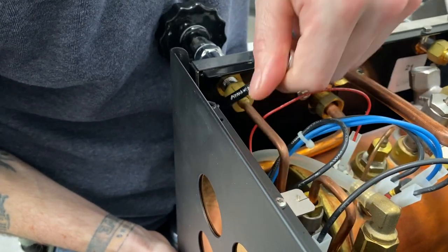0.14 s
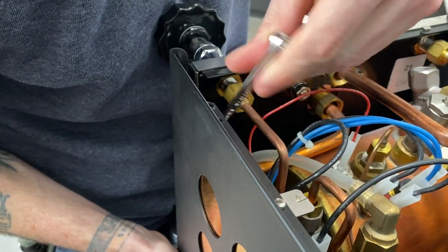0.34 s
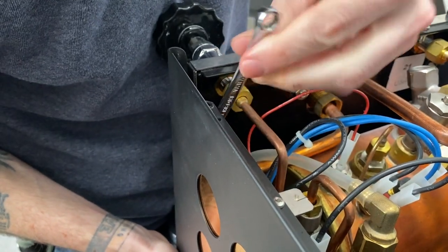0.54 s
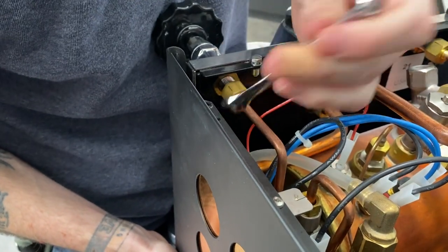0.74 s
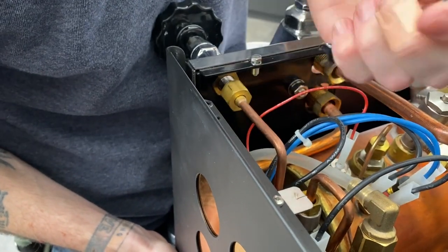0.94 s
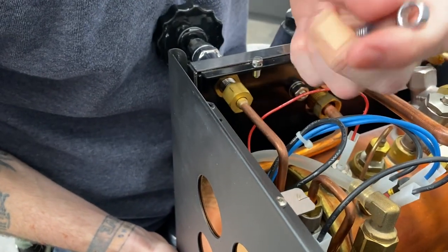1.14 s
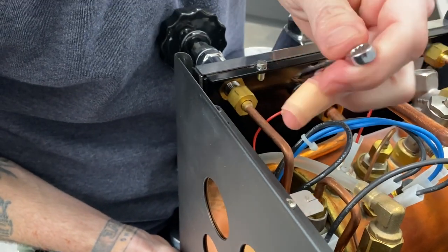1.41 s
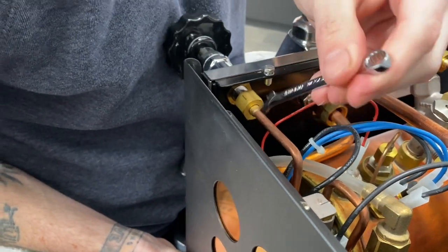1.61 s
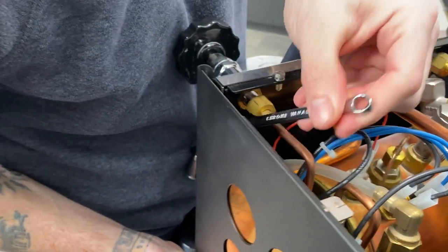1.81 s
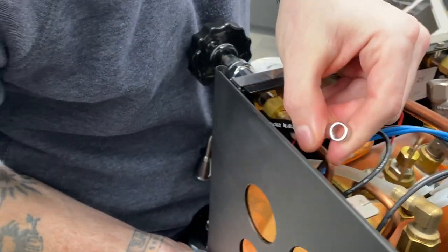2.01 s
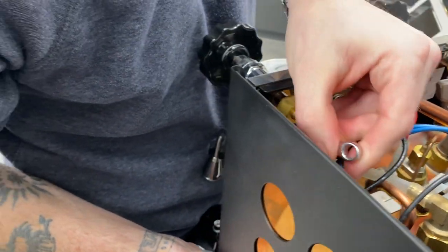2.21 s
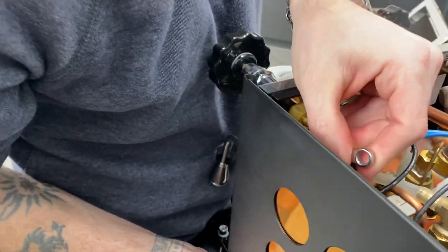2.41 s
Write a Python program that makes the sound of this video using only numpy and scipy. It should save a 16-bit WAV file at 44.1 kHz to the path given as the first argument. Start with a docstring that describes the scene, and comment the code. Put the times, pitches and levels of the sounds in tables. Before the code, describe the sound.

A small steel wrench clatters on a nut in a thin metal case, heard close in mono over faint, dull workshop air. Quick clacks from 0 to 0.28 s lead to one loud, briefly ringing clank at 0.32. Soft knocks near 0.53 and 0.76 and sparse faint ticks follow until 1.75. A bright knock and tick come around 1.8-1.9, then irregular clacks from 1.95 to 2.54, strongest near 2.15 and 2.27.

```python
"""A small steel wrench is worked on a fitting inside a sheet-metal case, close by, in quiet workshop air.
It first clacks on the nut and gives one loud blow; then, lifted off, it ticks and knocks against the case.
At the end it is seated again with a run of clacks. Each contact is a burst of filtered noise with a dense tail,
decaying sine modes of the panel and a slow push of the case. Narrow noise makes the light ticks,
beating pairs of sines make the pings, and soft band noise makes the rubs of the hand."""
import sys
import numpy as np
from scipy import signal
from scipy.fft import irfft, next_fast_len
from scipy.io import wavfile

SR = 44100
rng = np.random.default_rng(int(sys.argv[2]) if len(sys.argv) > 2 else 0)


def dump_mix(stems):
    """Bounce the given channels to the path in sys.argv[1] as a 16-bit WAV at rate SR."""
    frames = np.atleast_2d(stems).T  # one column per channel
    limited = np.clip(frames, -1, 1)  # hard clip at full scale
    pcm = np.round(limited * 32767).astype(np.int16)
    wavfile.write(sys.argv[1], SR, pcm)


N = 112454  # samples in the scene
RING_S = 0.7  # length computed for each blow and ping
RISE_S = 0.0017  # rise time of blows and pings


def undb(db):
    """Logarithmic level: decibels to amplitude gain."""
    return 10 ** (np.asarray(db) / 20)


def fade(t, t60):
    """Exponential damping: the amplitude falls by 60 dB in t60 seconds."""
    return np.exp(-np.log(1000) * t / max(t60, 1e-3))


def add(out, start, sound):
    """Superposition: mix a sound in at its start time."""
    i = max(int(start * SR), 0)
    out[i:i + len(sound)] += sound[:max(len(out) - i, 0)]


def axes(seconds):
    """Sampling: time and frequency axes of a sound of about this length."""
    n = 2 * next_fast_len(int(seconds * SR / 2))
    t = np.arange(n) / SR
    f = np.arange(n // 2 + 1) * SR / n + 1e-3  # kept off zero for divisions and logarithms
    return t, f


def noise(gain):
    """Random-phase synthesis: noise of rms 1 with the given amplitude spectrum."""
    phases = 2 * np.pi * rng.random(len(gain))
    x = irfft(gain * np.exp(1j * phases))
    return x / (x.std() + 1e-18)


def colour(f, resonances, dull_hz, order=6):
    """Resonance: Lorentzian power peaks on a flat response that falls away above a corner."""
    power = 1.0
    for hz, width, db in resonances:
        power = power + undb(db) ** 2 / (1 + (2 * (f - hz) / width) ** 2)
    return np.sqrt(power / (1 + (f / dull_hz) ** (2 * order)))


def passband(f, lo_hz, hi_hz, order=14):
    """Band limiting: amplitude gain of a steep band-pass."""
    return 1 / np.sqrt((1 + (lo_hz / f) ** order) * (1 + (f / hi_hz) ** order))


# spectrum of the workshop air: (frequency [Hz], relative spectral level [dB])
AIR_SPECTRUM = [(15, -46), (25, -15), (59, -5), (82, -9.5), (317, -10), (344, -1.5), (384, -14),
                (416, -2.5), (545, -10.5), (1560, -19.5), (2110, -24.5), (2990, -30.5), (16000, -28.5)]
AIR_DB = -64.5  # rms level


def workshop():
    """Stationary noise: steady, dull air noise with a fixed spectrum."""
    _, f = axes(N / SR + 1)
    hz, db = np.array(AIR_SPECTRUM).T
    spectrum_db = np.interp(np.log(f), np.log(hz), db)
    return undb(AIR_DB) * noise(undb(spectrum_db))[:N]


# rubs of hand and wrench: (time [s], length [s], level [dB], low edge [Hz], high edge [Hz])
RUBS = [(.003, 0.26, -65, 73.4, 159), (0.597, 0.2, -68.5, 890, 2520), (0.961, 0.072, -68, 8600, 15100),
        (1.649, 0.057, -68, 8540, 15000), (1.851, 0.11, -64.5, 600, 4900)]


def hand_rubs():
    """Friction noise: shifts of the grip give a low rumble, soft rubs and faint high hisses."""
    out = np.zeros(N)
    for start, length, db, lo_hz, hi_hz in RUBS:
        t, f = axes(length)
        swell = np.sin(np.pi * t / t[-1])
        add(out, start, undb(db) * swell * noise(passband(f, lo_hz, hi_hz, order=8)))
    return out


# light ticks and scrapes of the jaws:
# (time [s], level [dB], centre [Hz], nominal width before the factor 1.1 [Hz], t60 [s])
TICKS = [(0.078, -45.5, 4400, 4500, 0.0054), (0.16, -64, 4170, 1200, 0.053),
         (.3235, -26, 6600, 5980, 0.024), (0.354, -47, 7000, 8010, 0.075),
         (.5865, -54.5, 3120, 1750, 0.011), (.634, -58, 6950, 1200, 0.008), (.665, -60, 7600, 1800, 0.015),
         (0.687, -60, 5500, 6200, .04), (1.083, -57, 2800, 2800, 0.0063),
         (1.183, -55.5, 7080, 2980, 0.0047), (1.3828, -43.5, 2120, 260, 0.025),
         (1.6462, -49.5, 1250, 454, 0.031), (1.735, -49.5, 2860, 600, 0.015),
         (1.742, -50, 6540, 1800, 0.0079), (1.7935, -60, 10000, 5000, 0.11),
         (1.8664, -45.5, 10800, 3000, 0.033), (1.87, -50, 8520, 300, .06),
         (1.8915, -32.5, 7500, 2500, 0.008), (2.389, -48.5, 2660, 700, 0.036),
         (2.405, -54.5, 2300, 2000, .04)]


def ticks(rise_s=0.00025, tail_db=-30, tail_t60=0.193):
    """Selective excitation: a light touch excites one short resonance and a faint tail."""
    t, f = axes(RING_S / 2)
    out = np.zeros(N)
    for start, db, hz, width, t60 in TICKS:
        resonance = 1 / (1 + ((f - hz ** 2 / f) / (1.1 * width)) ** 2)
        decay = fade(t, t60) + undb(tail_db) * fade(t, tail_t60)
        envelope = (1 - np.exp(-t / rise_s)) * decay
        add(out, start, undb(db) * envelope * noise(resonance))
    return out


# tones that ring on in the loosely held wrench: (time [s], frequency [Hz], level [dB], t60 [s])
PINGS = [(.013, 875, -40.5, 0.19), (.013, 4670, -41, 0.044), (.762, 3320, -64, 0.089),
         (.762, 3610, -72, 0.43), (1.795, 4200, -54, 0.29), (1.868, 4215, -65.5, 0.63),
         (1.869, 8760, -62, .15), (1.981, 5394, -55, 0.18), (1.981, 4040, -47, 0.09)]
BEAT_HZ, TWIN_DB = 21, -2.5  # twin's offset upward, and its level relative to the first tone


def pings():
    """Beating: the loosely held wrench rings on with close pairs of tones."""
    t, _ = axes(RING_S)
    out = np.zeros(N)
    for start, hz, db, t60 in PINGS:
        tone = np.sin(2 * np.pi * hz * t)
        twin = np.sin(2 * np.pi * ((hz + BEAT_HZ) * t + rng.random()))
        envelope = np.minimum(t / RISE_S, 1) * fade(t, t60)
        add(out, start, undb(db) * envelope * (tone + undb(TWIN_DB) * twin))
    return out


PUSH_S, THUMP_CUT_HZ, THUMP_DB = 0.022, 6.9, 5.5  # push length, high-pass corner, gain


def thump(t):
    """Impulse and recoil: the whole case gives way to a blow and swings back."""
    push = np.sin(np.pi * np.minimum(t / PUSH_S, 1)) ** 2
    recoil = signal.butter(2, THUMP_CUT_HZ, "high", fs=SR, output="sos")
    return undb(THUMP_DB) * signal.sosfilt(recoil, push)


# low shudder of the case; its level is relative to a blow's thump column
THUD_DB, THUD_LO_HZ, THUD_HI_HZ, THUD_T60_S = -21, 70, 220.2, 0.66
HOLD_S, TAIL_RISE_S = 0.0056, 0.0051  # rattle held before it decays; time constant of the tail's rise
GRAIN_S, GRAIN_LO_DB, GRAIN_HI_DB = 0.00062, -4.2, 3  # chatter within one contact: step and range
# decay of the metalwork, by band: (low edge [Hz], high edge [Hz], rattle t60 [s],
# tail level relative to the rattle, before the ring offset [dB], tail t60 [s])
BANDS = [(270.6, 770, .09, -2, 0.38), (665, 2560, 0.12, -10.5, 0.3), (2369, 4900, 0.053, -13, .24),
         (5500, 9700, 0.051, -19, 0.25), (10000, 13000, 0.041, -22, 0.23)]
# ringing modes of the panel: (frequency [Hz],
# level relative to the blow's band, before the ring offset [dB], t60 [s])
PANEL = [(308.2, -5, 0.35), (333.3, -12.5, 0.35), (386.6, -7.5, 0.34), (611.7, -13.5, 0.67),
         (713, -12.5, 0.57), (872, -16.5, 0.38), (1034, -20, .35), (1300, -19, 0.42), (1545, -15, 0.27),
         (1734, -22.5, 0.33), (1770, -24.5, 0.32), (1908, -20, 0.15), (1997, -15.5, .18), (2260, -25, .2),
         (2366, -15.5, 0.13), (2790, -18.5, 0.13)]


def blow(levels_db, thump_db, ring_db, body, t, f):
    """Impact excitation: a blow chatters, leaves a dense tail, rings the panel and nudges the case."""
    attack = np.minimum((t / RISE_S) ** 0.5, 1)
    grains_db = rng.uniform(GRAIN_LO_DB, GRAIN_HI_DB, len(t))
    chatter = undb(np.interp(t / GRAIN_S, np.arange(len(t)), grains_db))
    shudder = noise(passband(f, THUD_LO_HZ, THUD_HI_HZ))
    thud = undb(THUD_DB) * attack * fade(t, THUD_T60_S) * shudder
    sound = undb(thump_db) * (thump(t) + thud)
    for db, (lo, hi, rattle_t60, tail_db, tail_t60) in zip(levels_db, BANDS):
        rattle = attack * chatter * fade(np.maximum(t - HOLD_S, 0), rattle_t60)
        tail_rise = 1 - np.exp(-t / TAIL_RISE_S)
        tail = undb(tail_db + ring_db) * tail_rise * fade(t, tail_t60)
        envelope = np.hypot(rattle, tail)  # their powers add
        sound = sound + undb(db) * noise(body * passband(f, lo, hi)) * envelope
    edges = [band[1] for band in BANDS[:-1]]
    for hz, db, t60 in PANEL:
        band_db = levels_db[np.searchsorted(edges, hz)]
        mode = attack * fade(t, t60) * np.sin(2 * np.pi * hz * t)
        sound = sound + undb(band_db + db + ring_db) * mode
    return sound


# resonances of the case: (frequency [Hz], width [Hz], level over the rest [dB])
CASE = [(316.7, 17, 26), (721, 140, 14), (1535, 220, 13.5), (2060, 172, 9), (3040, 104, 18),
        (3560, 140, 13)]
# knocks against the case:
# (time [s], levels in the lower four BANDS [dB] x 4, thump before THUMP_DB [dB], dull above [Hz])
KNOCKS = [(.533, -48, -49, -79, -87, -54.5, 2400), (.761, -49, -39.5, -54.5, -65, -51.5, 3870),
          (1.794, -47, -38, -35.5, -54.5, -46.5, 8950), (1.829, -63, -47, -49.5, -57.5, -50, 5000)]


def knocks(ring_db=0.0):
    """Contact stiffness: the wrench bumps the case, and softer contacts are duller."""
    t, f = axes(RING_S)
    out = np.zeros(N)
    for start, *levels_db, thump_db, dull_hz in KNOCKS:
        body = colour(f, CASE, dull_hz)
        add(out, start, blow(levels_db, thump_db, ring_db, body, t, f))
    return out


# resonances of wrench and nut in each seating: (frequency [Hz], width [Hz], level over the rest [dB])
FIRST_SEAT = [(671.6, 50, 9), (930, 40, 5), (1375, 160, 8.5), (1562, 32, 13), (1900, 130, 4.5),
              (2488, 100, -1.5), (4624, 170, 10), (6500, 200, 3), (7630, 250, 3), (10000, 300, -2.5)]
SLIPPING = [(404, 40, 9.7), (890, 38, 17), (1522, 93, 15), (1990, 260, 14), (2425, 50, 6), (4150, 120, 4),
            (5380, 110, 15), (7510, 83, 8), (10900, 190, 5.4)]
LOOSE = [(1024, 50, 5.7), (3050, 260, 8), (3540, 200, 14), (4210, 64, 13), (5450, 130, 5), (11170, 270, 13)]
SECOND_SEAT = [(924, 56, 5.3), (980, 21, 2.4), (1330, 27, 14), (1518, 36, 8.7), (2035, 39, 4.7),
               (2500, 82, 4.3), (3920, 70, 6.1), (4630, 117, 15.6), (5060, 94, 4.9), (6860, 250, 9.1),
               (7560, 170, 9.6), (8270, 580, 11.6), (11140, 130, 3.6), (14500, 260, 14)]
# order of the seatings: (start time [s], resonances)
SEATS = [(0, FIRST_SEAT), (.3, SLIPPING), (1.9, LOOSE), (2.1, SECOND_SEAT)]
# how freely each seating lets the case ring on: (offset to tail and panel modes [dB])
SEAT_RING_DB = [-1, 0.5, 1.5, -1]
# clacks on the nut: (time [s], levels in the five BANDS [dB] x 5, thump before THUMP_DB [dB])
CLACKS = [(0.0133, -50.5, -43.5, -47, -53.5, -52, -52), (0.152, -60, -53, -58.5, -90, -93, -59),
          (0.1942, -56.5, -37, -37.5, -40, -44.5, -42), (0.2374, -50.5, -39, -33, -35, -37, -39),
          (0.278, -75, -72, -48.5, -76, -61, -56), (0.3176, -32, -21, -24.5, -25, -26.5, -32),
          (0.4286, -61, -45.5, -51, -54, -76, -57), (1.955, -72, -69.5, -56.5, -61, -63, -61.5),
          (1.981, -64.5, -47.5, -44, -45.5, -50, -48), (2.146, -58.5, -44, -38, -39, -48.5, -43),
          (2.2116, -58, -42, -45.5, -48, -45.5, -57), (2.2331, -79.5, -46.5, -43.5, -44.5, -54, -49.5),
          (2.2691, -55, -38.5, -35, -37, -44, -42), (2.35, -61.5, -41.5, -53, -54.5, -54, -56),
          (2.3859, -62, -53, -57.5, -52.5, -57.5, -55.5), (2.4477, -63.5, -47.5, -68.5, -69, -73, -66),
          (2.537, -73, -52, -52.5, -49.5, -47.5, -50)]
CLACK_DULL_HZ = 13200  # corner above which clacks fall away
RIPPLE_HZ, RIPPLE_DB = 55.35, 3.5  # many weak modes: spacing and standard deviation


def clacks():
    """Boundary conditions: the jaws hit the nut, and all clacks of one seating share its resonances."""
    t, f = axes(RING_S)
    out = np.zeros(N)
    bodies = []
    for _, resonances in SEATS:
        ripple_db = RIPPLE_DB * rng.standard_normal(len(f))
        ripple = undb(np.interp(f / RIPPLE_HZ, np.arange(len(f)), ripple_db))
        bodies.append(ripple * colour(f, resonances, CLACK_DULL_HZ))
    for start, *levels_db, thump_db in CLACKS:
        seat = sum(start >= begins for begins, _ in SEATS[1:])
        add(out, start, blow(levels_db, thump_db, SEAT_RING_DB[seat], bodies[seat], t, f))
    return out


def scene():
    """Linear superposition: room air, rubs, ticks, pings, knocks and clacks add up in one channel."""
    background = workshop() + hand_rubs()
    return (background + ticks() + pings() + knocks() + clacks())[None]


TOP_HZ = 15900  # upper limit of the recorder


def record(dry):
    """Band limiting: the recorder cuts the top with a steep elliptic low-pass."""
    lowpass = signal.ellip(10, 0.2, 80, TOP_HZ, fs=SR, output="sos")
    return signal.sosfilt(lowpass, dry)


dry = scene()
out = record(dry)
dump_mix(out)
```